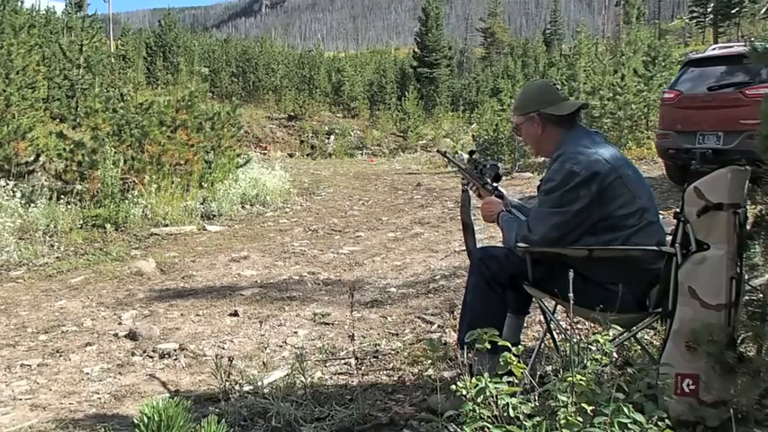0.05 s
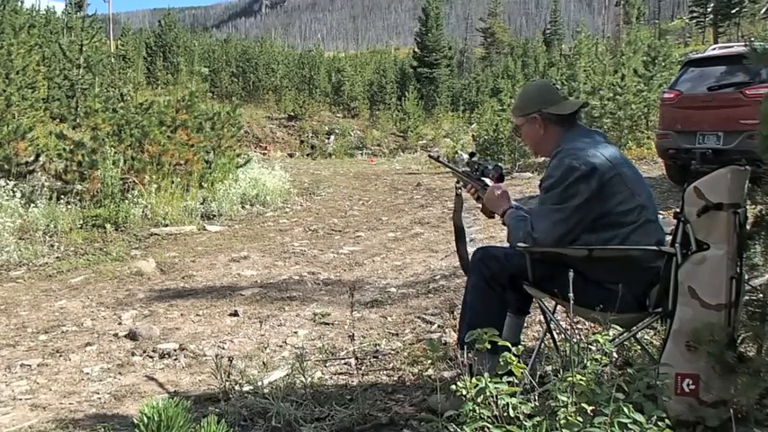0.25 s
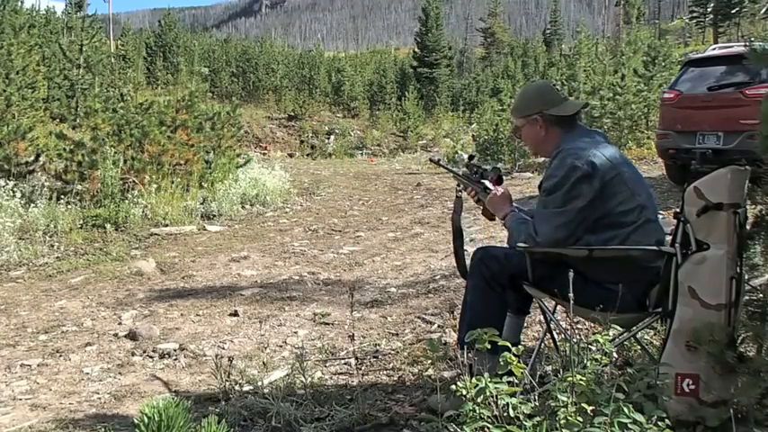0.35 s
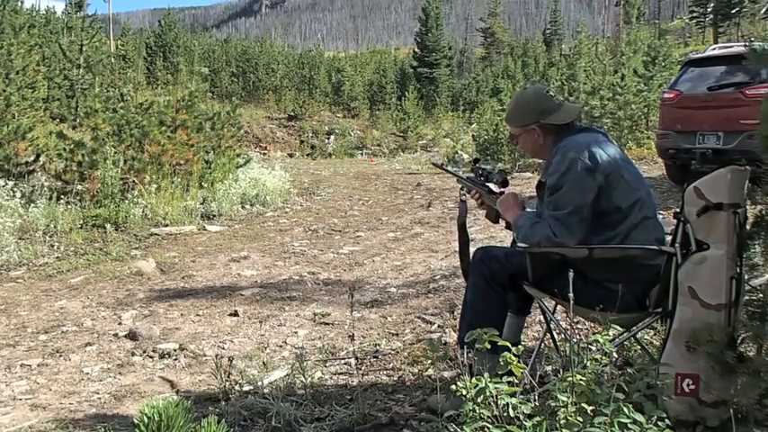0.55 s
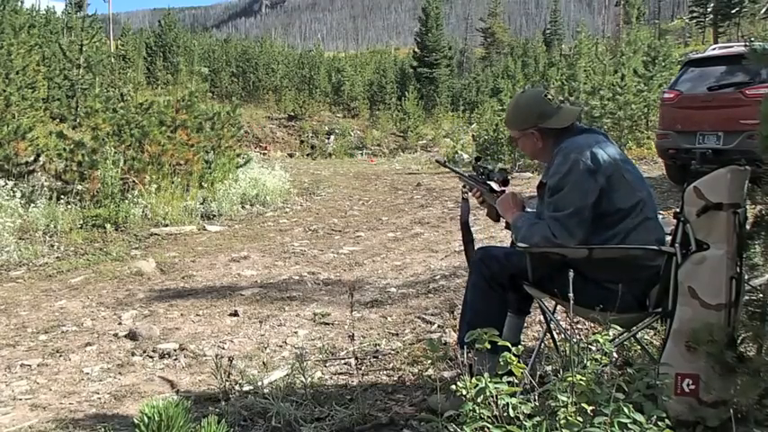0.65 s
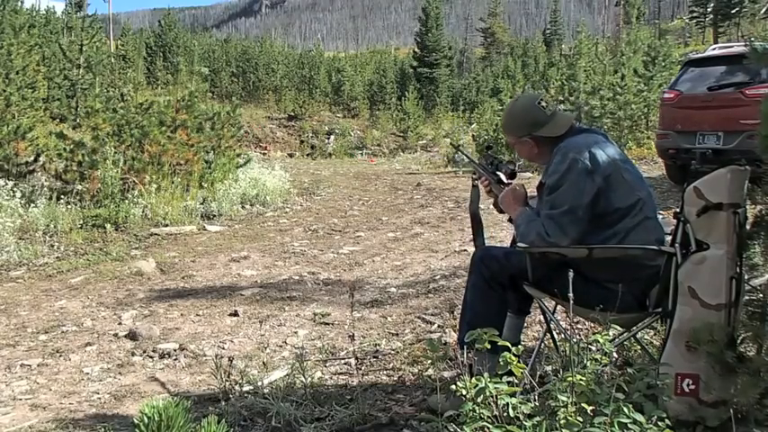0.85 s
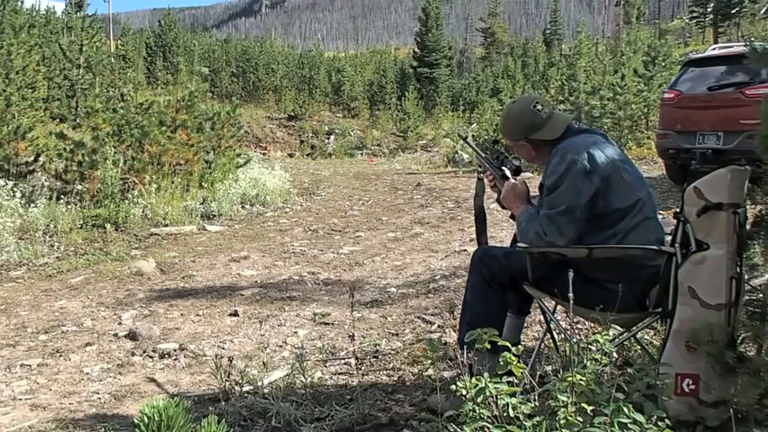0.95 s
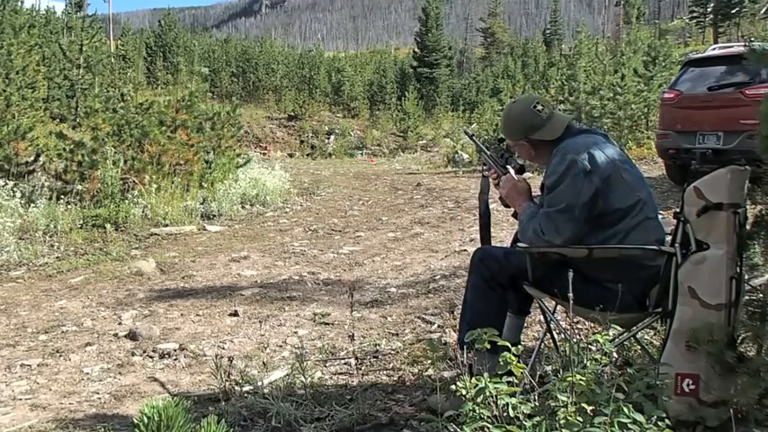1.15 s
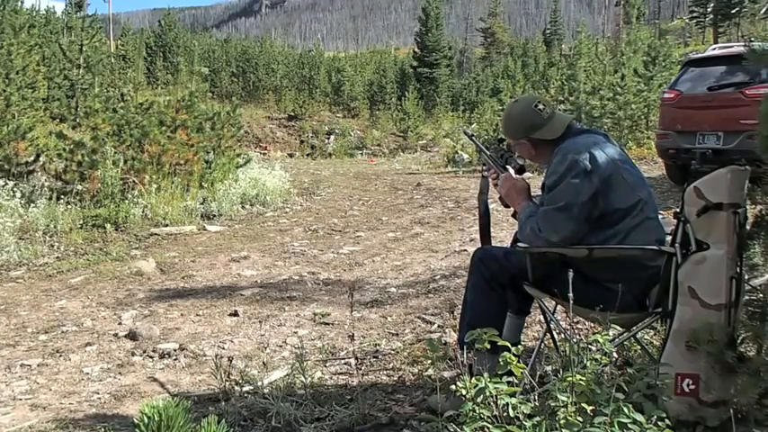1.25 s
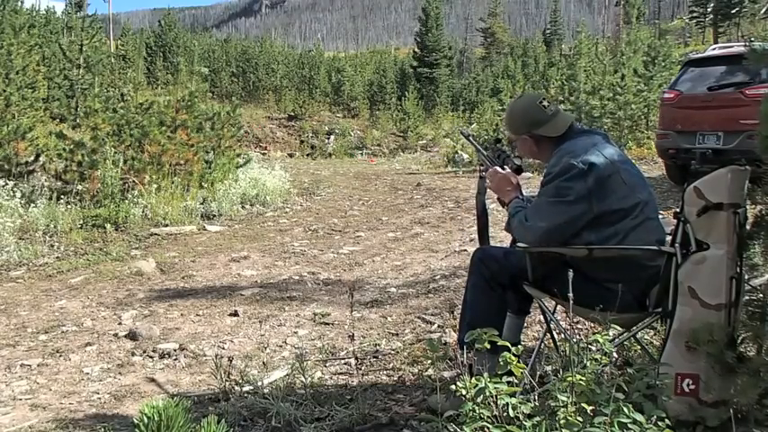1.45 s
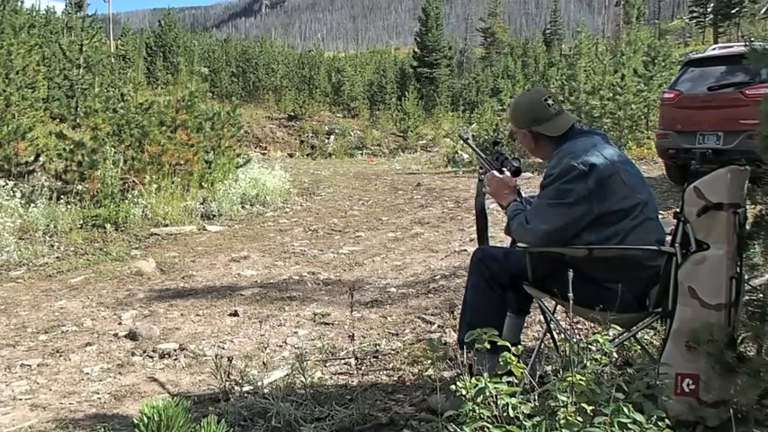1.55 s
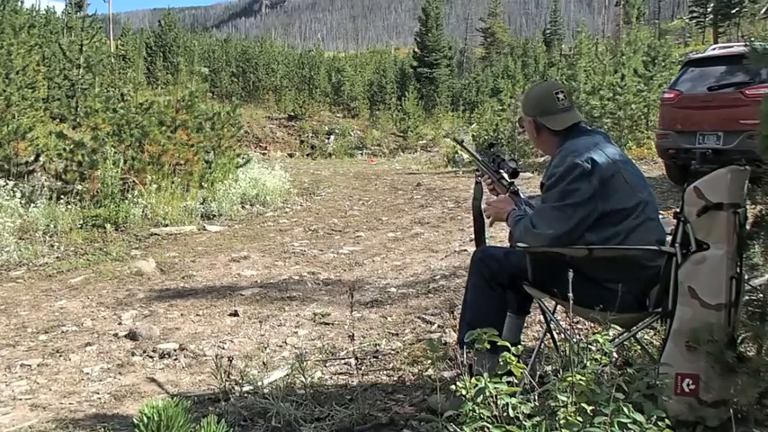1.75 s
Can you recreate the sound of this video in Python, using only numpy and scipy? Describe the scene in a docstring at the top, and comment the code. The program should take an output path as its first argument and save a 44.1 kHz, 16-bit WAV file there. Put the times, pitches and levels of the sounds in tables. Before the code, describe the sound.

A rifle bolt is worked a few metres away over the faint hiss of still outdoor air. The handle clicks up at 0.2 seconds, and the bolt slams back loudest at 0.4, with a thin brass case ring. Faint dry ticks come at 0.9 and a short ping at 1.2. The bolt scrapes forward, clacks home at 1.4 and locks with a softer click around 1.6.

```python
"""A bolt-action rifle is worked a few metres away in a quiet forest clearing.
The handle lifts and the bolt slams back: each impact excites damped modes of the steel and the stock.
A brass case rings as it tumbles; after a few dry ticks and two shorter pings, one very faint, the bolt
slides forward with stick-slip friction, hits home and is locked down.
Ground and trees scatter a faint tail over the hiss of still air."""
import sys
import numpy as np
from scipy import signal
from scipy.fft import rfft, irfft
from scipy.io import wavfile
from scipy.ndimage import uniform_filter1d

SR = 44100
rng = np.random.default_rng(int(sys.argv[2]) if len(sys.argv) > 2 else 0)


def pcm_store(signal):
    """Save signal as 16-bit PCM."""
    levels = np.round(np.clip(np.atleast_2d(signal), -1, 1) * 32767)
    wavfile.write(sys.argv[1], SR, levels.astype(np.int16).T)


N = 79380

# spectrum of still air (frequency [Hz], relative density [dB])
AIR_SPECTRUM = [(25, -26), (64, -14.5), (200, -11.5), (400, -8.5), (490, -10), (800, -3), (1200, -4.5),
                (2350, -8.5), (3400, -12), (4200, -7.5), (4800, -18.5), (11300, -15), (16000, -24)]
# steel impacts: the handle lifts (0.19 s), the bolt runs back (0.38 s), is handled (0.72 s), runs home
# (1.3 s) and locks (1.57 s); thud, clack, snap and fizz are band gains relative to the level
# (time [s], level [dB], thud [dB], clack [dB], snap [dB], fizz [dB], t60 [s])
STEEL_KNOCKS = [ (.1942, -21.5, 1, 0, 4, 10, 0.036), (.2065, -23, 6, -6, 14, 18.5, 0.032),
                (.2098, -4, -8, -5, -16.5, -12, 0.012), (.283, -29, 10, 2, -15, -26, 0.0097),
                (.376, -32.5, 8, 7.5, 4.5, 8, 0.012), (.4058, -13, -6, 0, 3, 3, 0.027),
                (.4088, -20.5, 4, 2.5, -4, 13, 0.088), (.4178, -8.5, -3.5, -20, 1.5, 1, 0.0054),
                (.4234, -17, 6, -9.5, 11, 10, 0.0037), (.4256, -6, 3.5, 0, 9.5, 16.5, 0.016),
                (.4325, -21.5, 12, 5, -2, 6, 0.017), (.7192, -43.5, 13, 1, 0, 1, 0.012),
                (.921, -52, 14, 25, 16, 6, 0.011), (1.1845, -24.5, -6, -22, 4, -3, 0.068),
                (1.194, -37, 6, 12.5, 11, 6, 0.067), (1.305, -25.5, -21, 2, -6, -14, .025),
                (1.322, -29.5, 5, 2, -5, -3, 0.02), (1.3299, -18.5, -7, 7, -17, -5, 0.02),
                (1.3332, -19.5, 6.5, 4.5, -9, -16, 0.026), (1.3412, -37, 5, 9, 1, -1, 0.018),
                (1.3558, -18, 5.5, 10, -7, 2, 0.019), (1.366, -24, -6, 13.5, 4, 1, 0.035),
                (1.370, -27.5, -3, 6.5, -9, 3, 0.026), (1.382, -34.5, 3, 6, 3, 6, 0.014),
                (1.3892, -27.5, 7.5, 0, -16, -1, 0.019), (1.406, -33, 7, 9, 9, -3, 0.043),
                (1.4128, -6, -4.5, 1, 2, 3, 0.023), (1.5698, -36.5, 3, 3.5, -14, -6, 0.012),
                (1.5988, -26, 6, 3, 7.5, 0, 0.064), (1.6362, -29, 8, -14, -17, -2, 0.043),
                (1.6486, -20.5, 9.5, 3, 9.5, 6.5, 0.0055), (1.6522, -24.5, 16, 9.5, 11.5, -17, 0.0033)]
# spectrum of a knock before its band gains (frequency [Hz], gain [dB])
KNOCK_SPECTRUM = [(60, -65), (250, -34.5), (470, -38.5), (670, -19.5), (1100, -10.5), (1900, -10),
                  (3300, -4), (4200, -2.5), (5200, -14), (7000, -20), (11000, -29.5), (15000, -27.5)]
# modes of receiver, barrel and stock (frequency [Hz], relative level [dB])
RIFLE_MODES = [(700, -14), (1100, -20.5), (1430, -7), (1835, -7.5), (1975, -2), (2420, -0.5), (2700, -7),
               (3020, -5), (3290, -8.5), (3490, -4.5), (3700, -6.5), (3965, 1.5), (4160, 2), (4395, -13),
               (4890, -39)]
# spectrum of the scattered tail (frequency [Hz], gain [dB])
TAIL_SPECTRUM = [(200, -1), (700, -25), (1500, -22), (2500, -20), (4300, -17.5), (5200, -21.5), (8000, -14),
                 (15000, -23)]
# reverberation time of the clearing (frequency [Hz], t60 [s])
TAIL_DECAY = [(300, 0.069), (2000, 0.34), (4200, 0.33), (8000, 0.11), (15000, 0.18)]
# single reflections (delay [s], gain [dB])
REFLECTIONS = [(.0032, -29), (0.035, -28)]
# single parts ringing, from the stock's thunk to steel zings
# (time [s], frequency [Hz], level [dB], t60 [s])
PART_ZINGS = [ (.2098, 970, -39, 0.046), (.2098, 3300, -10, 0.013), (.2098, 4950, -14, 0.02),
              (.4178, 3550, -3.5, 0.0078), (.4178, 1570, -18.5, 0.014), (.4258, 3326, -11, 0.017),
              (1.192, 5480, -30, .036), (1.195, 5940, -29, 0.023), (1.3055, 2990, -32.5, 0.09),
              (1.3055, 4047, -28, 0.045), (1.3415, 12150, -37.5, 0.13), (1.3562, 2973, -19, 0.021),
              (1.366, 1790, -18, .03), (1.4135, 740, -32, 0.032), (1.6485, 648, -22, 0.02),
              (1.6485, 2660, -23, 0.025)]
# modes of the brass case (frequency [Hz], t60 [s])
CASE_MODES = [(9862, 0.18), (12800, 0.17), (14425, 0.19), (14535, 0.18)]
# blows to the case
# (time [s], swell rate [Hz], first swell [s], extra damping [dB/s], level of each of four modes [dB])
CASE_PINGS = [(.433, 25.6, 0.008, 3.6, -35, -29.5, -29, -23), (.918, 30, 0.018, 150, -80, -64, -58, -34),
              (1.1845, 31, 0.002, 170, -19, -32.5, -48, -33)]
# dry ticks, as of the case landing on dirt and gravel (time [s], peak [dB], snap [dB])
DRY_TICKS = [(.9108, -26.5, 3), (.9136, -28, 5.5), (.9175, -29.5, 1)]
# spectrum of a tick (frequency [Hz], relative gain [dB])
TICK_SPECTRUM = [(60, -11), (250, -10), (800, 4), (2000, 5.5), (4000, 4.5), (6000, -15), (15000, -11.5)]
# friction of the bolt's forward stroke (time [s], level [dB])
SLIDE_ENVELOPE = [(1.295, -51), (1.311, -44), (1.328, -42), (1.342, -28.5), (1.35, -32), (1.356, -22.5),
                  (1.371, -30), (1.378, -51), (1.41, -40)]
# spectrum of steel rubbing on steel (frequency [Hz], relative gain [dB])
RUB_SPECTRUM = [(100, -56), (450, -25.5), (700, -11), (1700, -1.5), (3000, 6), (4300, -9), (5500, -9.5),
                (8000, -21.5), (15000, -24)]

AIR_DB, AIR_PATCH_DB, TAIL_PATCH_DB = -55.5, 1.5, 3.5
BASS_HZ, THUD_HZ, CLACK_HZ, STEEL_HZ, SNAP_HZ, FIZZ_HZ = 200, 590, 1700, 3260, 7770, 13500
CONTACT_S, RING_T60_S, RING_DB, RING_SCATTER_DB = 0.0005, 0.027, -10, 0.5
GRIP_DETUNE, ZING_WANDER = 0.012, 0.03  # rms fractions of the frequency
TUMBLE_FLOOR = 0.25  # amplitude in a dip relative to a swell
GRIT_DB, GRIT_T60_S = -14, 0.015
SLIPS_PER_S, SLIP_SPREAD_DB, SLIDE_RING_DB = 1400, 2.8, -5
LOW_CUT_HZ, BAND_LIMIT_HZ = 206, 15900


def amp(db):
    """Amplitude ratio of a level in decibels."""
    return 10 ** (np.asarray(db) / 20)


def unit_rms(x):
    """Normalisation to an rms of 1."""
    return x / np.sqrt(np.mean(x ** 2) + 1e-20)


def curve_at(points, hz):
    """Interpolation of a table on a logarithmic frequency axis."""
    table_hz, value = np.transpose(points)
    return np.interp(np.log(hz + 1), np.log(table_hz + 1), value)


def add(mix, start_s, sound):
    """Superposition of a sound on the mix from a given time."""
    part = mix[round(start_s * SR):][:len(sound)]
    part += sound[:len(part)]


def minimum_phase(db):
    """Causal frequency response with the given gains, by folding the cepstrum."""
    cepstrum = irfft(np.log(amp(db)))
    half = len(cepstrum) // 2
    cepstrum[1:half] *= 2
    cepstrum[half + 1:] = 0
    return np.exp(rfft(cepstrum))


def decay(t, t60):
    """Exponential damping, 60 dB down after t60."""
    return np.exp(-np.log(1000) * t / t60)


def patches(shape, bins, frames):
    """A random field, correlated over neighbouring frequency bins and time frames."""
    field = uniform_filter1d(rng.standard_normal(shape), size=bins, axis=0)
    return unit_rms(uniform_filter1d(field, size=frames, axis=1))


def still_air():
    """Ambient noise: a soft, continuous spectrum whose level drifts in faint patches."""
    hz, _, spectrum = signal.stft(rng.standard_normal(N), SR, nperseg=2048, noverlap=1536)
    drift_db = AIR_PATCH_DB * patches(spectrum.shape, bins=20, frames=6)
    spectrum *= amp(curve_at(AIR_SPECTRUM, hz)[:, None] + drift_db)
    hiss = signal.istft(spectrum, SR, nperseg=2048, noverlap=1536)[1][:N]
    return amp(AIR_DB) * unit_rms(hiss)


def steel_knock(level_db, thud_db, clack_db, snap_db, fizz_db, t60, size=4096):
    """Impact excitation: dense, damped modes merge into a crack, and the rifle's distinct modes ring."""
    t, hz = np.arange(size) / SR, np.fft.rfftfreq(size, 1 / SR)
    bands = [(BASS_HZ, 0), (THUD_HZ, thud_db), (CLACK_HZ, clack_db),
             (STEEL_HZ, 0), (SNAP_HZ, snap_db), (FIZZ_HZ, fizz_db)]
    onset = 1 - np.exp(-t / CONTACT_S)
    burst = rfft(rng.standard_normal(size) * onset * decay(t, t60))
    # the burst's own broad colour is divided out
    burst_db = 10 * np.log10(uniform_filter1d(abs(burst) ** 2, size=40) + 1e-12)
    colour_db = curve_at(KNOCK_SPECTRUM, hz) + curve_at(bands, hz)
    crack = irfft(burst * minimum_phase(colour_db - burst_db))
    ring = np.zeros(size)
    for mode_hz, mode_db in RIFLE_MODES:
        scatter_db = RING_SCATTER_DB * rng.standard_normal()
        ring += amp(mode_db + curve_at(bands, mode_hz) + scatter_db) * rifle_mode(mode_hz, t)
    return amp(level_db) * (20 * crack + amp(RING_DB) * ring)


def rifle_mode(hz, t):
    """Damped free vibration of one mode, starting softly at a random phase and detuned by the grip."""
    detuned_hz = hz * (1 + GRIP_DETUNE * rng.standard_normal())
    onset = (1 - np.exp(-t / CONTACT_S)) ** 2
    return onset * np.sin(2 * np.pi * (detuned_hz * t + rng.random())) * decay(t, RING_T60_S)


def clearing_tail(direct):
    """Reflection and scattering: ground and trees return single echoes and a thin, uneven tail."""
    hz, t, spectrum = signal.stft(rng.standard_normal(SR // 2), SR, nperseg=256)
    t60 = curve_at(TAIL_DECAY, hz)[:, None]
    envelope = decay(t, t60) * np.sqrt(2 * np.log(1000) / (t60 * SR))  # scaled for equal energy at any t60
    spectrum *= amp(curve_at(TAIL_SPECTRUM, hz))[:, None] * envelope
    spectrum *= amp(TAIL_PATCH_DB * patches(spectrum.shape, bins=8, frames=3))
    response = signal.istft(spectrum, SR, nperseg=256)[1]
    for delay_s, db in REFLECTIONS:
        add(response, delay_s, amp([db]))
    return signal.fftconvolve(direct, response)[:N]


def part_zing(hz, db, t60):
    """Frequency modulation: a struck part rings, its pitch wavering as it chatters in its seat."""
    t = np.arange(SR // 5) / SR
    wander = ZING_WANDER * unit_rms(uniform_filter1d(rng.standard_normal(len(t)), size=24))
    phase = 2 * np.pi * np.cumsum(hz * (1 + wander)) / SR
    onset = 1 - np.exp(-t / CONTACT_S)
    band = signal.butter(2, [hz / 2, min(2 * hz, BAND_LIMIT_HZ)], "band", fs=SR, output="sos")
    return amp(db) * signal.sosfilt(band, onset * np.sin(phase) * decay(t, t60))


def case_ping(swell_hz, first_swell_s, damping_db_per_s, *mode_db):
    """Directional radiation: the high modes of the thin brass case swell and dip as it turns."""
    t = np.arange(SR // 3) / SR
    angle = np.pi * swell_hz * (t - first_swell_s)  # two swells a turn
    directivity = np.cos(angle) + 1j * TUMBLE_FLOOR * np.sin(angle)
    tone = sum(amp(db) * decay(t, t60) * np.exp(2j * np.pi * hz * t)
               for (hz, t60), db in zip(CASE_MODES, mode_db))
    return (tone * directivity).imag * amp(-damping_db_per_s * t)


def dry_tick(peak_db, snap_db, size=2048):
    """Impulsive contact: one hard, broadband pulse with a trace of grit and no resonance."""
    t, hz = np.arange(size) / SR, np.fft.rfftfreq(size, 1 / SR)
    force = (t == 0) + amp(GRIT_DB) * rng.standard_normal(size) * decay(t, GRIT_T60_S)
    colour_db = curve_at(TICK_SPECTRUM, hz) + curve_at([(STEEL_HZ, 0), (SNAP_HZ, snap_db)], hz)
    pulse = irfft(rfft(force) * minimum_phase(colour_db))
    return amp(peak_db) * pulse / abs(pulse).max()


def bolt_slide(size=2048):
    """Stick-slip friction: tiny random slips rasp and ring the rifle under the pressure of the stroke."""
    t, hz = np.arange(size) / SR, np.fft.rfftfreq(size, 1 / SR)
    slips = (rng.random(N) < SLIPS_PER_S / SR) * rng.choice([-1, 1], N)
    strength = amp(SLIP_SPREAD_DB * np.minimum(rng.exponential(1, N), 3))
    rasp = irfft(minimum_phase(curve_at(RUB_SPECTRUM, hz)))
    ring = sum(amp(db + curve_at(RUB_SPECTRUM, mode_hz)) * rifle_mode(mode_hz, t)
               for mode_hz, db in RIFLE_MODES)
    slip_response = unit_rms(rasp) + amp(SLIDE_RING_DB) * unit_rms(ring)
    scrape = signal.fftconvolve(slips * strength, slip_response)[:N]
    friction_db = np.interp(np.arange(N) / SR, *np.transpose(SLIDE_ENVELOPE), left=-np.inf, right=-np.inf)
    return unit_rms(scrape) * amp(friction_db)


def scene():
    """Superposition of the rifle's direct sound, its reflections and the ambient noise."""
    rifle = bolt_slide()
    for events, source in ((STEEL_KNOCKS, steel_knock), (DRY_TICKS, dry_tick),
                           (PART_ZINGS, part_zing), (CASE_PINGS, case_ping)):
        for start_s, *settings in events:
            add(rifle, start_s, source(*settings))
    # the rifle's direct sound carries little bass
    low_cut = signal.butter(2, LOW_CUT_HZ, "high", fs=SR, output="sos")
    rifle = signal.sosfilt(low_cut, rifle)
    return (rifle + clearing_tail(rifle) + still_air())[None]


def record(dry):
    """Band limiting: a linear-phase low-pass filter removes the highest treble."""
    low_pass = signal.firwin(255, BAND_LIMIT_HZ, window=("kaiser", 8), fs=SR)
    return signal.oaconvolve(dry, low_pass[None], "same")


dry = scene()
out = record(dry)
pcm_store(out)
```